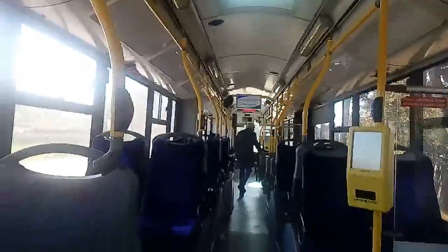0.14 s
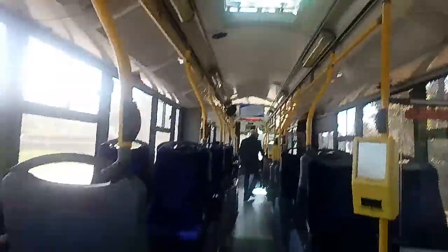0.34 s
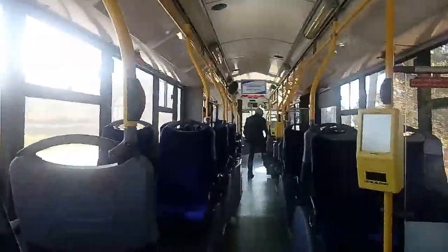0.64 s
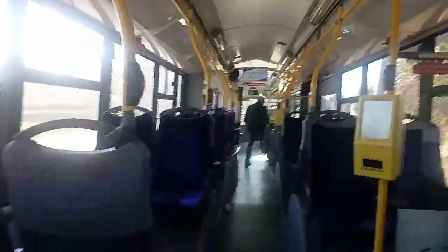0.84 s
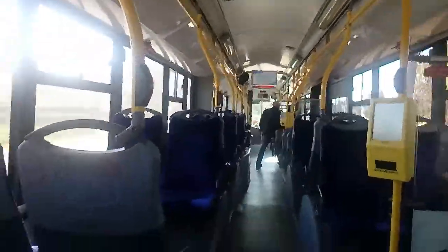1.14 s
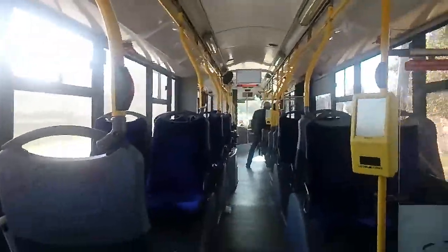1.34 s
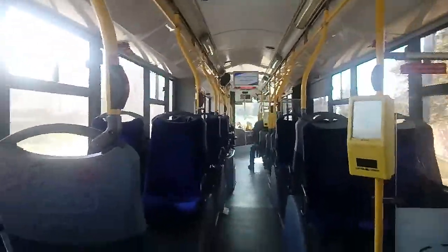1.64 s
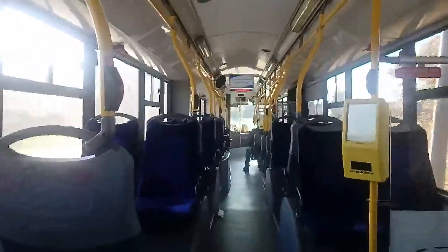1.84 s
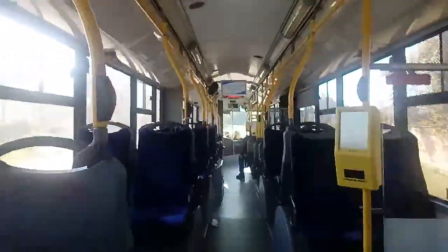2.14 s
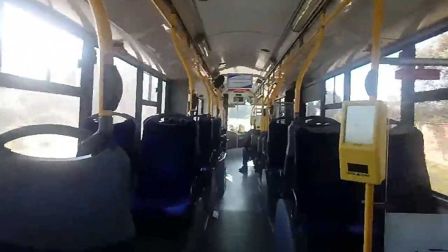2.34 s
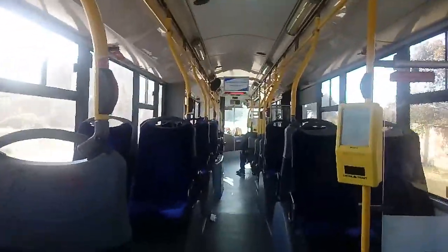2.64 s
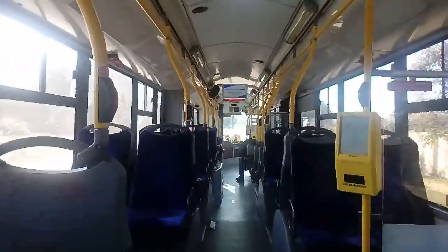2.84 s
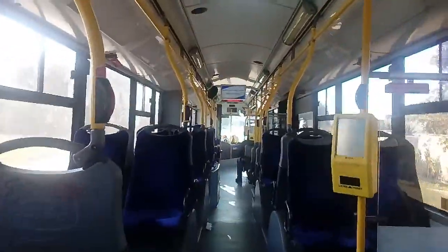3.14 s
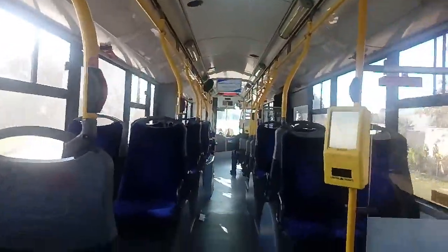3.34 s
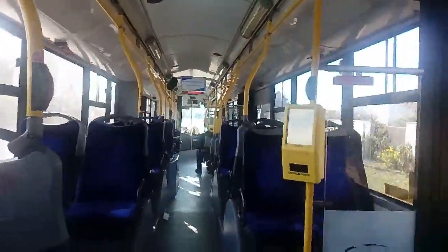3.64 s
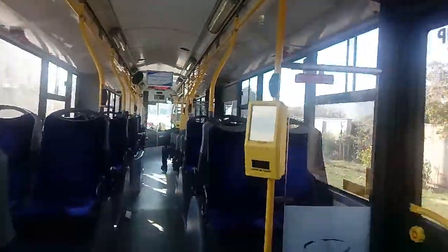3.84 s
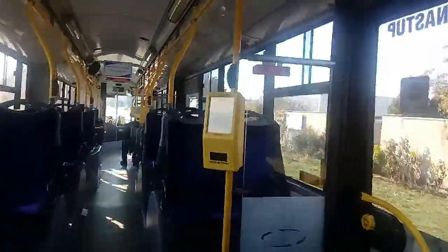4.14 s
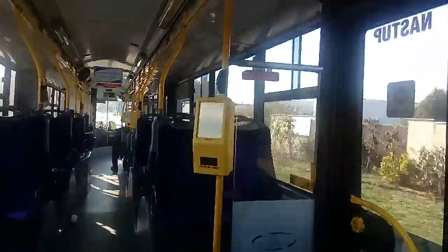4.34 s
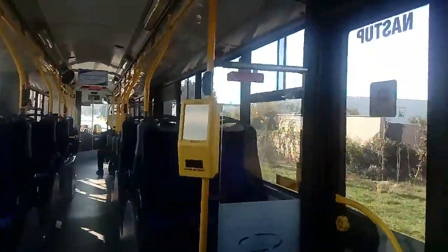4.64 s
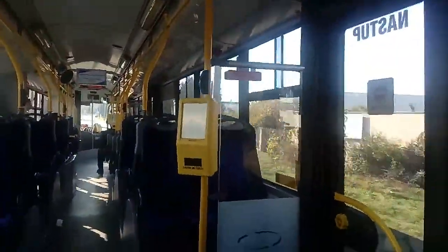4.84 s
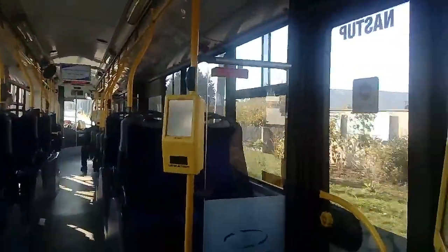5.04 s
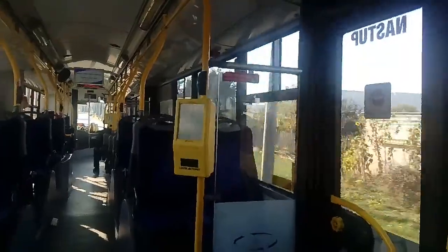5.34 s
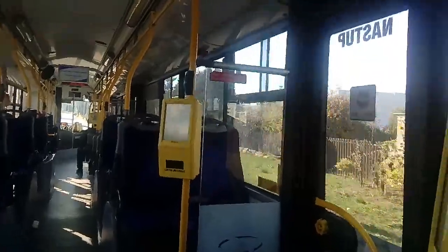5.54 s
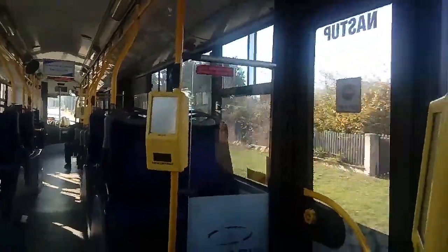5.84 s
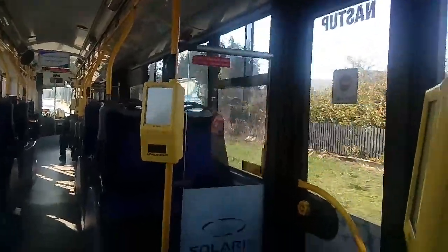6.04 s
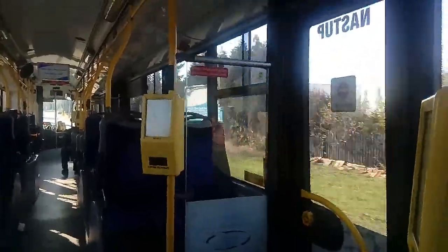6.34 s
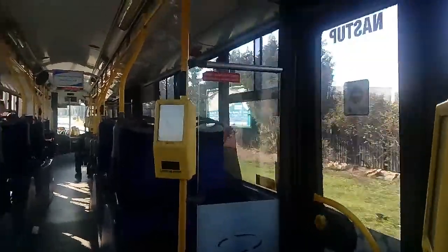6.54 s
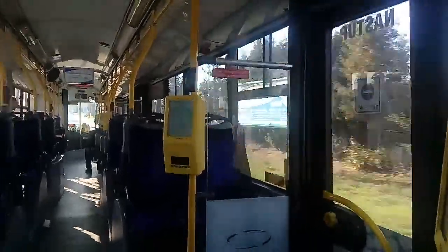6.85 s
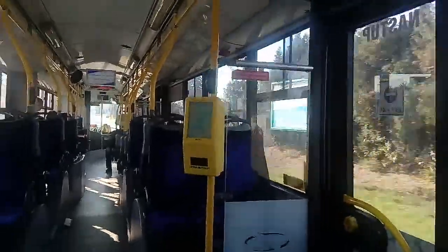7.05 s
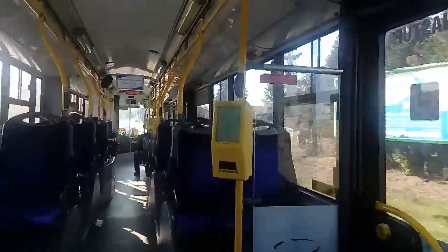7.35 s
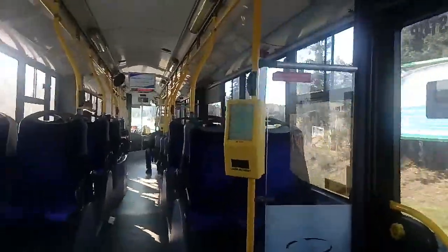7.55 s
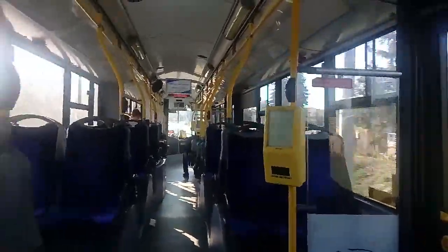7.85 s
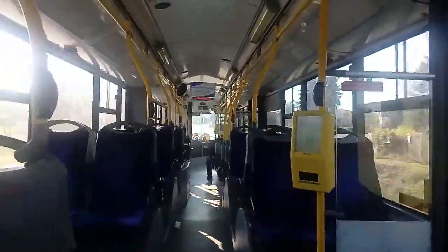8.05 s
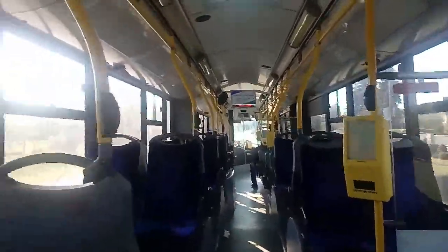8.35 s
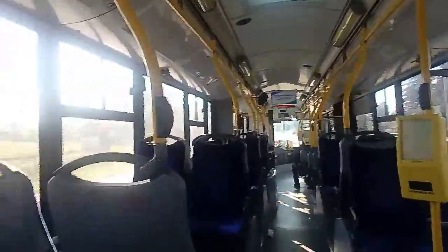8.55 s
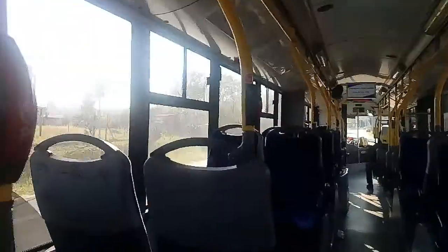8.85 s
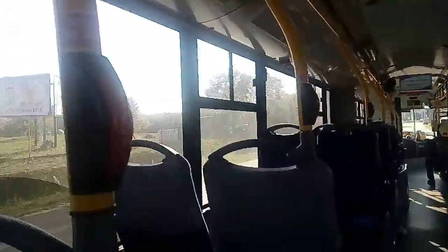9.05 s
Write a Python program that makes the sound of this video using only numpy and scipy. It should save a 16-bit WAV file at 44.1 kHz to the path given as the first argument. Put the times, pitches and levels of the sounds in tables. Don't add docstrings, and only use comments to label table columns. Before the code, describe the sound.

From a rear seat of a nearly empty electric bus, low body booms, floor knocks, rattling fittings, small squeaks and a sharp air-valve puff open the ride. After about a second a two-toned motor whine fades in, beats and climbs steadily to the end, over ventilation and tyre roar and faint machine hum. The road smooths out, then a few soft bumps and a faint puff close it.

```python
import sys
import numpy as np
from scipy import signal
from scipy.io import wavfile

SR = 44100
rng = np.random.default_rng(int(sys.argv[2]) if len(sys.argv) > 2 else 0)


def int16_out(signal):
    q = np.round(np.clip(np.atleast_2d(signal).T, -1, 1) * 32767)
    wavfile.write(sys.argv[1], SR, q.astype(np.int16))


def elevation(decibels):
    levels = np.asarray(decibels, float)
    return 10 ** (levels / 20)


N = 405135

# (time [s], speed [turns/s])
SHAFT_SPEED = [(1.2, 14.02), (1.5, 15.48), (1.9, 16.93), (2.7, 19.24), (3.3, 21.49), (4.5, 25.45),
               (5.2, 27.39), (5.95, 28.92), (7.5, 30.98), (9.18, 33.1)]
# (centre [Hz], width [Hz], level [dB], left-right [dB])
CABIN_WAVES_9 = [(147.8, 13.0, -22.6, -1.8), (174.3, 12.7, -13.9, -1.2), (188.3, 15.2, -18.5, -0.3),
                 (195.4, 7.3, -20.0, -4.5), (221.0, 17.6, -27.6, -1.1), (238.4, 7.9, -29.2, 1.8),
                 (251.9, 14.8, -22.1, -1.7), (273.5, 12.7, -11.4, 12.4), (275.0, 13.3, -12.2, -9.7),
                 (285.1, 10.8, -26.4, -14.0), (301.6, 39.3, -23.6, -2.8)]
CABIN_WAVES_10 = [(149.8, 4, -40.3, -1.7), (165.1, 5.5, -29.2, .1), (204.2, 13.6, -20.2, -2.3),
                  (216.2, 6.4, -25.6, -.9), (230.2, 4.4, -29.5, -.2), (248.5, 17.7, -33.7, -2.7),
                  (278.7, 9.5, -22.8, -.2), (300.4, 12.7, -20.3, -.3), (313.4, 9.1, -26.4, 4.2),
                  (320.8, 5.5, -30.5, 9.9), (333, 9, -30, -8)]
WAVE_SLIP_9 = [-.17, .08, .51, .81, .89, 1.3, 1.04, 1.41, .96, 1.35, 1.66]
WAVE_SLIP_10 = [0] * 10 + [.5]
# (order, level [dB], from [turns/s], to [turns/s])
GEAR_OVERTONES = [(15, 3, 25.2, 29.2), (15, 0, 29.2, 31.6), (15, 2.5, 31.6, 34), (18, 1, 27.6, 31.3),
                  (18, -5, 31.7, 32.8), (33, -5, 28.6, 29.8), (20, -3, 18.6, 21.6), (20, -1, 31, 32.8),
                  (27, -1, 21.8, 34), (30, -2, 16.4, 23.9), (36, -3.5, 20, 27.2), (31.5, -7, 16.6, 18),
                  (45, -11, 16, 25)]
# (centre [Hz], width [Hz], level [dB])
BODY_RESONANCES = [(398, 40, -41), (445, 60, -46), (488, 24, -41), (512, 20, -41), (548, 30, -41),
                   (580, 30, -41), (635, 36, -42), (695, 30, -40), (726, 24, -40), (788, 40, -42),
                   (860, 34, -41), (912, 24, -44), (966, 24, -41), (1040, 50, -45)]
OUTSIDE_DB, EDGE_TURNS_PER_S = -13, .25
PORT_LAG_S = 0.000098
TURNED_FROM_S, TURNED_TO_S, TURNING_S, TURNED_LAG_S = 4.3, 7.5, .4, .00014

# (time [s], boom level [dB], floor knock level [dB])
WHEEL_BUMPS = [(-.05, -18.5, -21), (.14, -37, -39), (.26, -27, -26.5), (.33, -26, -22), (.44, -23, -30),
               (.59, -28.5, -22.5), (0.731, -26, -29), (.86, -29, -30), (1.0, -29, -27.5),
               (1.1, -22.5, -23), (1.2, -32, -37), (1.57, -24, -33), (1.82, -24.5, -25.5),
               (1.94, -27.5, -42), (2.12, -31.5, -31), (2.97, -35.5, -32), (4.1, -40.5, -30.5),
               (4.9, -34, -32.5), (5.04, -37, -31), (5.62, -35, -41), (5.79, -36, -41), (6.55, -43, -45),
               (7.45, -33.5, -45), (7.94, -34, -41), (8.2, -43, -36), (8.35, -28.5, -33), (8.44, -30, -27),
               (8.53, -29, -28), (8.64, -32.5, -29.5), (9.0, -31.5, -33)]
# (frequency [Hz], density [dB/Hz])
BOOM_SPECTRUM = [(20, -15.5), (40, -10.5), (55, -14), (68, -2.5), (82, -9.5), (100, -10.5), (135, -9.5)]
# (centre [Hz], width [Hz], level [dB])
FLOOR_PANELS = [(134, 37, -11), (165.7, 33, 4.5), (221.2, 23, 3.5), (297, 35, 2), (388, 50, -15.5),
                (458, 14, -12), (600, 36, -9)]
SMOOTH_BOOM_DB, SMOOTH_KNOCK_DB = -38, -34.5
BUMP_RISE_S, BUMP_T60_S = .04, .65

# (time [s], peak [dB], T60 [s], brightness [Hz])
HARD_JOLTS = [(.265, -21, 0.26, 326), (0.333, -24, 0.28, 940), (.39, -40, 0.33, 350),
              (.62, -26, 0.063, 346), (.85, -24, .3, 346), (1.10, -28.5, 0.31, 553),
              (1.235, -34, 0.15, 350), (1.88, -26, 0.28, 450), (5.5, -33, 0.99, 700),
              (6.35, -41, 0.36, 600), (8.5, -37, 0.31, 600)]
# (centre [Hz], width [Hz], level [dB])
FITTING_MODES = [(214, 20, -4.5), (310, 78, 0.5), (511, 240, -1), (540, 37, -1), (750, 43, -0.5),
                 (860, 53, 0)]
# (time [s], level [dB], centre [Hz], length [s])
TRIM_SQUEAKS = [
    (.53, -36, 2140, 0.077),
    (0.612, -39.5, 2300, 0.084),
    (2.246, -45, 6300, 0.059),
    (3.272, -38, 2420, .04),
    (6.785, -36, 4500, .025),
]

# (time [s], peak [dB], T60 [s], centre [Hz], width [Hz])
VALVE_PUFFS = [
    (.428, -35, .15, 5500, 4000),
    (0.502, -33, .2, 4400, 2500),
    (.545, -25, 0.46, 5200, 2000),
    (0.549, -29.5, 0.45, 3780, 1000),
    (0.59, -31.5, 0.3, 5460, 2210),
    (1.2, -29.5, .18, 4900, 1300),
    (6.775, -40.5, 0.17, 4930, 2000),
    (8.348, -56, 0.092, 5000, 2500),
    (8.698, -40, .4, 5360, 2500),
]
PUFF_RISE_SHARE = 0.019

# (pitch [Hz], level [dB], swell [dB])
MACHINE_HUM = [(145.5, -41, 1), (292, -44, 1.5), (323, -48, 1.5), (364.7, -46, 1.5), (740, -55, 2),
               (968.5, -49, 1.5)]
# (time [s], length [s], level [dB])
COMPRESSOR_RUNS = [
    (4.15, .9, -52),
    (5.9, 0.85, -39.5),
    (6.53, 0.17, -32),
]
COMPRESSOR_HZ, COMPRESSOR_IDLE_DB = 100.3, -49.5

# (frequency [Hz], density [dB/Hz])
ROAR_SPECTRUM = [(330, -9), (387, -8.5), (430, -24), (480, -8.5), (600, -12), (720, -11), (950, -10.5),
                 (1120, -16), (1370, -19), (1900, -16), (2600, -21.5), (3990, -24.5), (5120, -30.5),
                 (6300, -23.5), (7800, -60.5)]
# (centre [Hz], width [Hz], level [dB])
ROAR_PANELS = [(785, 66, -18), (1204, 46, -15.5), (1658, 31, -14), (5200, 680, -14.5)]
# (time [s], length [s], lift [dB])
ROADSIDE_ECHOES = [(.5, 0.48, 1.5), (2.0, 0.26, 1), (6.0, 1.2, 2.5), (6.414, 0.2, 1.5), (8.2, 1.7, 1.5)]
ROAR_DB = -44
ROADSIDE_BROAD, ROADSIDE_TOP = 1, .3
HISS_DB, HISS_FADE_S, HISS_END_DB = 7.5, 3, -2

# (time [s], peak [dB])
FAINT_RUSTLES = [(0.088, -61.5), (0.233, -64.5), (0.3504, -65.5), (0.4263, -56), (0.5457, -50.5),
                 (0.5894, -56), (0.6492, -58), (0.7394, -68), (0.8295, -75), (0.9233, -64), (1.058, -62),
                 (1.2194, -72), (1.3894, -67.5), (1.54, -70), (1.6294, -69.5), (1.7294, -64.5),
                 (1.8574, -67.5), (1.9606, -61.5), (2.1097, -62), (2.2194, -68.5), (2.3594, -67),
                 (2.7127, -67.5), (3.3516, -67.5), (8.6747, -68), (8.8712, -70)]
# (frequency [Hz], density [dB/Hz])
RUSTLE_SPECTRUM = [(7700, -6.5), (8900, -13), (9700, -1), (10500, -5.5), (12500, -9.5), (15200, -9)]
RUSTLE_RISE_S, RUSTLE_T60_S, RUSTLE_CREST_DB = .008, 0.3, 9
AIR_DB, AIR_LEAN_DB = -84.5, 8

# (frequency [Hz], correlation)
PORT_LIKENESS = [(60, 0.9), (130, 1), (300, 0.92), (660, 0.51), (1470, 0.025), (3260, 0.035), (7260, 0.031)]
# (frequency [Hz], left-right [dB])
PORT_LEANING = [(60, 2), (100, 1), (170, -1), (300, 0), (510, -1), (860, -2), (1470, 2.5), (2500, 1.5),
                (4260, -4.5), (7260, -7)]
CABIN_T60_S, CABIN_SHARE = 0.089, 0.35
WHITE = rng.standard_normal((3, 2, N))


def drive():
    t = np.arange(N) / SR
    speed, = in_time(SHAFT_SPEED)
    turning_at = [TURNED_FROM_S, TURNED_FROM_S + TURNING_S, TURNED_TO_S - TURNING_S, TURNED_TO_S]
    turned = np.interp(t, turning_at, [0, 1, 1, 0])
    lag_s = (PORT_LAG_S + TURNED_LAG_S * turned) * np.array([[1], [0]])
    turns = np.cumsum(speed) / SR - speed * lag_s
    out = 0
    for order, waves, slip in ((9, CABIN_WAVES_9, WAVE_SLIP_9), (10, CABIN_WAVES_10, WAVE_SLIP_10)):
        heights = through(waves, order * speed)
        total = np.exp(2j * np.pi * np.array(slip)) @ heights
        pan_db = np.array(waves)[:, 3] @ heights ** 2 / np.sum(heights ** 2, axis=0)
        wave_turns = fine(np.unwrap(np.angle(total))) / (2 * np.pi)
        level_db = fine(20 * np.log10(abs(total))) + .8 * drift(14)
        out += tone(order * turns + wave_turns, level_db, fine(pan_db), wobble=0.03)
    for order, db, low, high in GEAR_OVERTONES:
        inside = np.clip(np.minimum(speed - low, high - speed) / EDGE_TURNS_PER_S, 0, 1)
        body_power = np.sum(through(BODY_RESONANCES, order * speed) ** 2, axis=0)
        level_db = db + OUTSIDE_DB * (1 - inside) + fine(10 * np.log10(body_power))
        phase_turns = order * turns + runout(order, turns)
        out += tone(phase_turns, level_db + drift(4), 3 * drift(1), wobble=.3)
    return out * np.clip(t / 0.41 - 2.5, 0, 1)


def runout(order, turns):
    return .12 * (order in (27, 36)) * np.sin(2 * np.pi * .4 * turns)


def road():
    s, boom_peaks_db, knock_peaks_db = np.transpose(WHEEL_BUMPS)
    boom_db = strikes(s, boom_peaks_db, BUMP_RISE_S, BUMP_T60_S, SMOOTH_BOOM_DB)
    knock_db = strikes(s, knock_peaks_db, BUMP_RISE_S, BUMP_T60_S, SMOOTH_KNOCK_DB)
    jolts = elevation(1.7 * drift(30))
    knock = 0
    for hz, width_hz, db in FLOOR_PANELS:
        once = resonance(pair(hz) * jolts, hz, 2 * width_hz)
        knock = knock + elevation(db) * rms_one(resonance(once, hz, 2 * width_hz))
    boom = banded(BOOM_SPECTRUM, patchy_db=0.0)
    return elevation(boom_db) * boom + elevation(knock_db) * rms_one(knock)


def fittings():
    out, t = np.zeros((2, N)), np.arange(SR // 2) / SR
    rattle = [elevation(db) * rms_one(resonance(pair(hz), hz, width_hz)) for hz, width_hz, db in FITTING_MODES]
    for s, peak_db, t60, bright_hz in HARD_JOLTS:
        at = int(s * SR)
        reach = [1 / (1 + (hz / bright_hz) ** 4) for hz, width_hz, db in FITTING_MODES]
        shaken = sum(k * x[:, at:at + len(t)] for k, x in zip(reach, rattle))
        shape = (1 - np.exp(-t / 0.012)) * elevation(peak_db - 60 * t / t60)
        out[:, at:at + len(t)] += shaken * shape[:shaken.shape[1]]
    for s, db, hz, length_s in TRIM_SQUEAKS:
        out += elevation(db) * swell(s, length_s) * rms_one(resonance(pair(hz), hz, 150))
    return out


def valve():
    out, t = np.zeros((2, N)), np.arange(SR // 2) / SR
    for s, peak_db, t60, hz, width_hz in VALVE_PUFFS:
        air = rng.standard_normal((2, len(t)))
        nozzle = rms_one(resonance(resonance(air, hz, width_hz), hz, 2 * width_hz))
        jet = nozzle + 0.29 * rms_one(resonance(air, 2700, 700))
        at = int(s * SR)
        shape = (1 - np.exp(-t / (PUFF_RISE_SHARE * t60))) * elevation(peak_db - 60 * t / t60)
        out[:, at:at + len(t)] += (jet * shape * elevation([[-2.0], [2.0]]))[:, :N - at]
    return out


def auxiliaries():
    t = np.arange(N) / SR
    out = 0
    for hz, db, swell_db in MACHINE_HUM:
        out = out + tone(hz * t, db + swell_db * drift(1.5), 2 * drift(1), wobble=.6)
    running = elevation(COMPRESSOR_IDLE_DB) + sum(elevation(db) * swell(s, length_s) for s, length_s, db in COMPRESSOR_RUNS)
    return out + running * tone(COMPRESSOR_HZ * t, 0, 0, wobble=0.54)


def roar():
    back_db = sum(db * swell(s, length_s) for s, length_s, db in ROADSIDE_ECHOES)
    level_db = ROAR_DB + ROADSIDE_BROAD * back_db
    mid_db = (1 - ROADSIDE_BROAD) * back_db
    top_db = HISS_END_DB + HISS_DB * swell(0, 2 * HISS_FADE_S) + ROADSIDE_TOP * back_db

    def lift_db(hz):
        return mid_db * np.exp(-np.log2(hz / 2200) ** 2) + top_db * np.exp(-np.log2(hz / 5500) ** 2 * 2)

    broad = banded(ROAR_SPECTRUM, patchy_db=0.53, extra_db=lift_db)
    rings = 0
    for hz, width_hz, db in ROAR_PANELS:
        rings = rings + elevation(db + 1.7 * drift(0.57)) * rms_one(resonance(pair(hz), hz, width_hz))
    return elevation(level_db + 10) * (broad + rings)


def rustle():
    s, peak_db = np.transpose(FAINT_RUSTLES)
    level_db = strikes(s, peak_db - RUSTLE_CREST_DB, RUSTLE_RISE_S, RUSTLE_T60_S, AIR_DB)
    air = elevation(level_db) * banded(RUSTLE_SPECTRUM, patchy_db=1.5)
    return air * elevation(AIR_LEAN_DB * np.array([[1], [-1]]))


def cabin(x):
    t = np.arange(SR // 8) / SR
    echoes = rng.standard_normal((2, len(t))) * elevation(-60 * t / CABIN_T60_S)
    echoes *= CABIN_SHARE / np.sqrt(np.sum(echoes ** 2, axis=1, keepdims=True))
    echoes[:, 0] = 1
    return signal.oaconvolve(x, echoes, axes=1)[:, :N] / np.sqrt(1 + CABIN_SHARE ** 2)


def tone(turns, level_db, pan_db, wobble):
    wander = wobble * np.array([drift(3.6), drift(4)])
    gain = np.sqrt(2) * elevation(level_db + pan_db * np.array([[.5], [-.5]]))
    return gain * np.sin(2 * np.pi * turns + wander)


def banded(spectrum, patchy_db, extra_db=lambda hz: 0):
    out, power, together = 0, 0, drift(2.8)
    low_hz, high_hz = spectrum[0][0], spectrum[-1][0]
    count = int(3 * np.log2(high_hz / low_hz)) + 1
    edges = np.geomspace(low_hz, high_hz, count + 1)
    for low, high in zip(edges, edges[1:]):
        hz = np.sqrt(low * high)
        band = signal.sosfilt(signal.butter(2, [low, high], "band", fs=SR, output="sos"), pair(hz))
        density_db = at_hz(spectrum, hz)
        out = out + band * elevation(density_db + extra_db(hz) + patchy_db * (together + drift(3.7)))
        power += elevation(density_db) ** 2 * (high - low) / (SR / 2)
    return out / np.sqrt(power)


def pair(hz):
    mid, side = np.roll(WHITE[rng.integers(3)], rng.integers(N), axis=1)
    alike = np.clip(at_hz(PORT_LIKENESS, hz), 0, 1)
    lean = elevation(at_hz(PORT_LEANING, hz) * np.array([[.5], [-.5]])) / np.sqrt(2)
    return lean * (np.sqrt(1 + alike) * mid + np.sqrt(1 - alike) * side * [[1], [-1]])


def resonance(x, hz, width_hz):
    r = np.exp(-np.pi * width_hz / SR)
    poles = [1, -2 * r * np.cos(2 * np.pi * hz / SR), r * r]
    return signal.lfilter(np.array([1, 0, -1]) * (1 - r * r) / 2, poles, x)


def through(waves, hz):
    centre, width, db = np.array(waves).T[:3, :, None]
    return elevation(db) / (1 + ((hz[::100] - centre) / width * 2) ** 2)


def fine(coarse):
    return np.interp(np.arange(N) / 100, np.arange(len(coarse)), coarse)


def strikes(times_s, levels_db, rise_s, t60, floor_db):
    since = np.maximum(np.arange(0, N, 50) / SR - times_s[:, None], 0)
    shape = ((1 - np.exp(-since / rise_s)) * elevation(-60 * since / t60)) ** 2
    power = elevation(floor_db) ** 2 + elevation(levels_db) ** 2 @ shape / shape.max()
    return np.interp(np.arange(N) / 50, np.arange(len(power)), 10 * np.log10(power))


def swell(s, length_s):
    return np.exp(-((np.arange(N) / SR - s) / length_s * 2) ** 2)


def drift(rate_hz):
    r = np.exp(-80 * np.pi * rate_hz / SR)
    slow = signal.lfilter([1], [1, -2 * r, r * r], rng.standard_normal(N // 40 + 4002))[4000:]
    return np.interp(np.arange(N) / 40, np.arange(len(slow)), rms_one(slow))


def in_time(rows):
    s, *columns = np.transpose(rows)
    return [np.interp(np.arange(N) / SR, s, c) for c in columns]


def at_hz(points, hz):
    points_hz, values = np.transpose(points)
    return np.interp(np.log(hz), np.log(points_hz), values)


def rms_one(x):
    return x / np.sqrt(np.mean(x ** 2) + 1e-20)


def scene():
    return drive() + auxiliaries() + cabin(roar() + valve()) + road() + fittings()


def top_cut(x):
    return signal.sosfilt(signal.butter(12, 15140, fs=SR, output="sos"), x)


def record(dry):
    heard = signal.sosfilt(signal.butter(14, 6950, fs=SR, output="sos"), dry)
    heard = .6 * np.tanh(1.03 * heard / .6)
    heard = signal.sosfilt(signal.butter(8, 7600, fs=SR, output="sos"), heard)
    heard[:, -80:] *= np.cos(np.linspace(0, 1.4, 80))
    return top_cut(heard + rustle())


dry = scene()
out = record(dry)
int16_out(out)
```